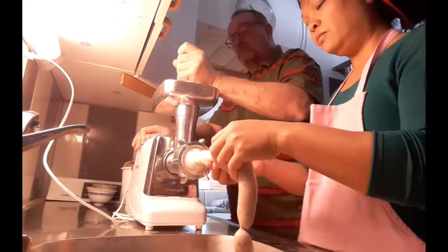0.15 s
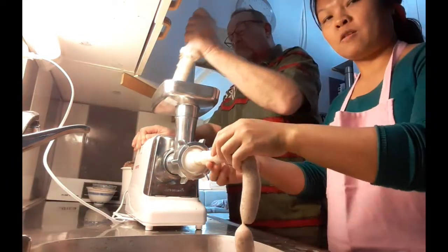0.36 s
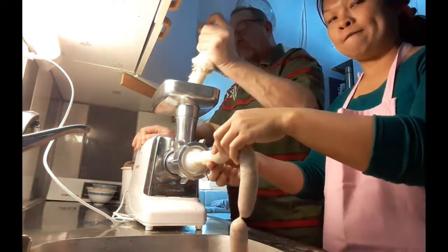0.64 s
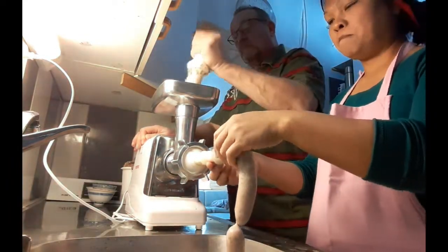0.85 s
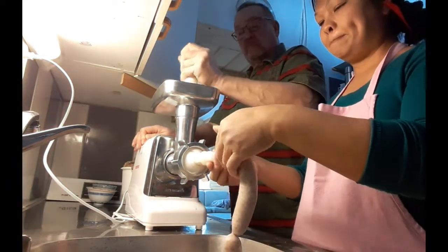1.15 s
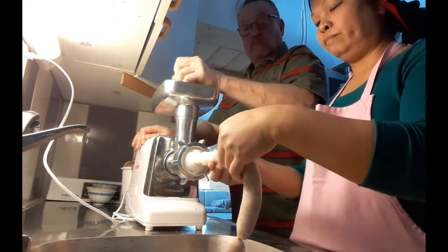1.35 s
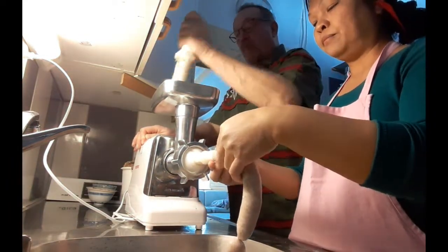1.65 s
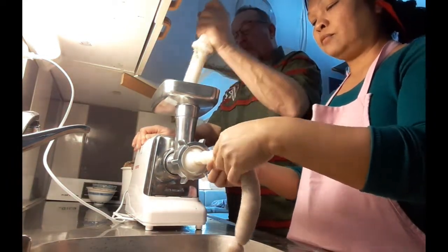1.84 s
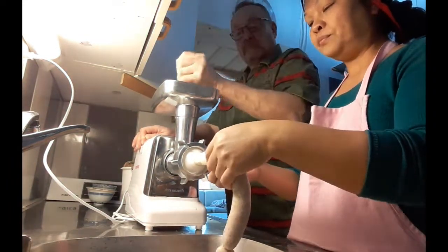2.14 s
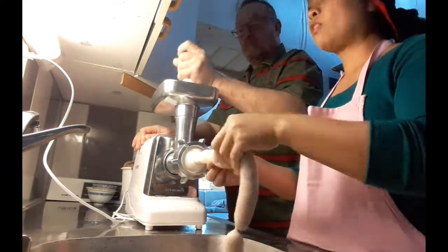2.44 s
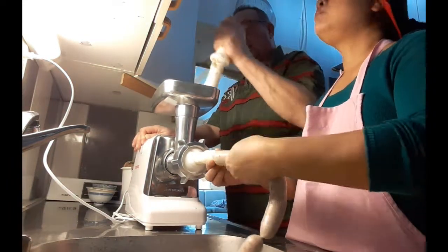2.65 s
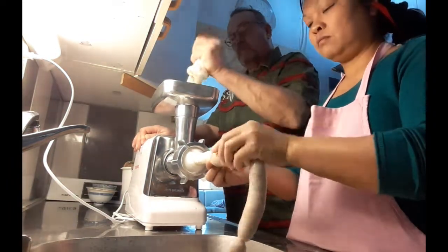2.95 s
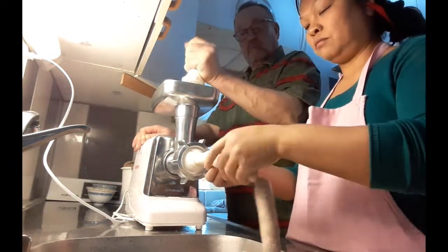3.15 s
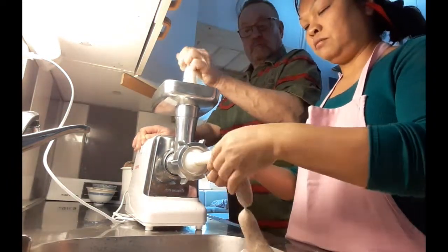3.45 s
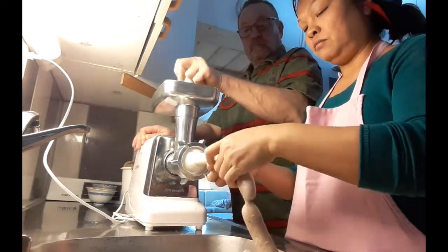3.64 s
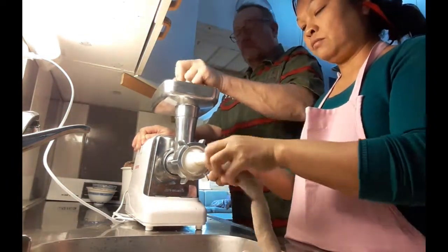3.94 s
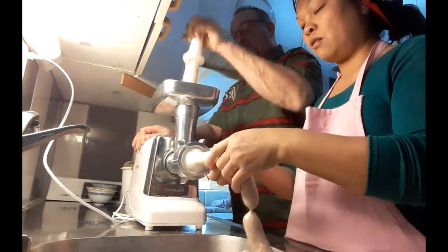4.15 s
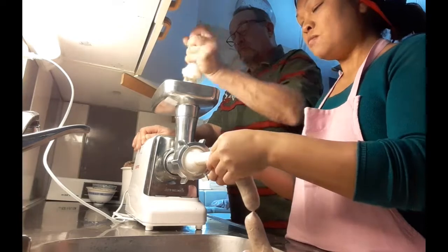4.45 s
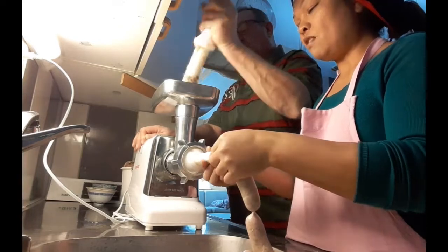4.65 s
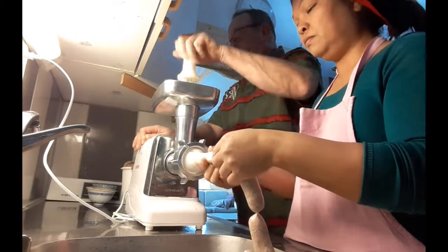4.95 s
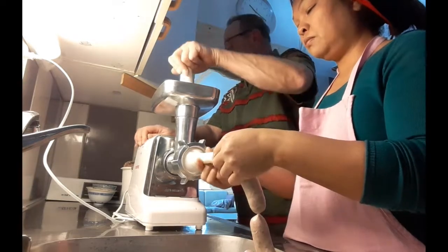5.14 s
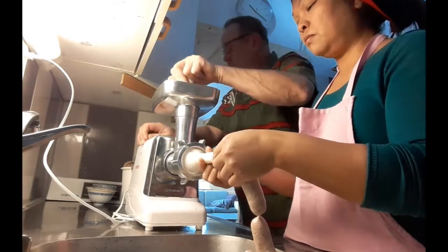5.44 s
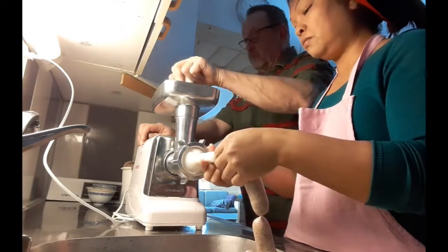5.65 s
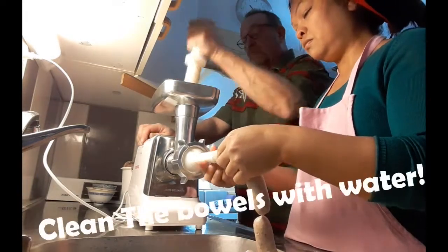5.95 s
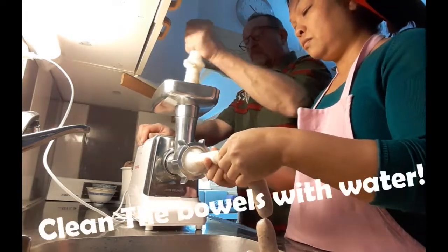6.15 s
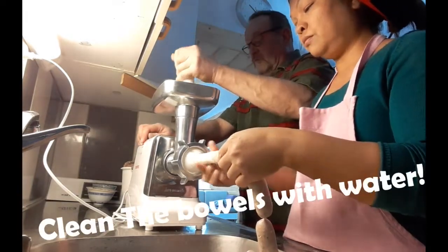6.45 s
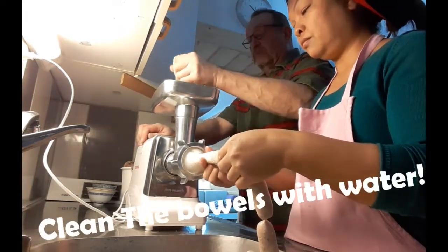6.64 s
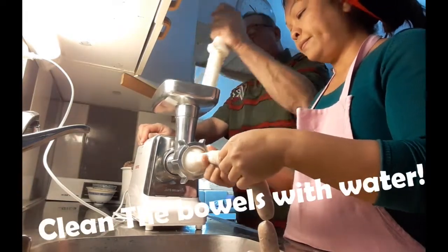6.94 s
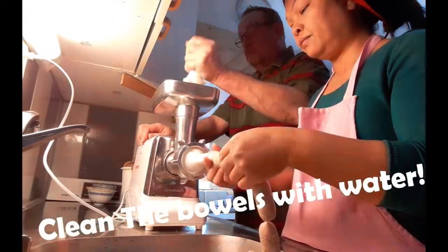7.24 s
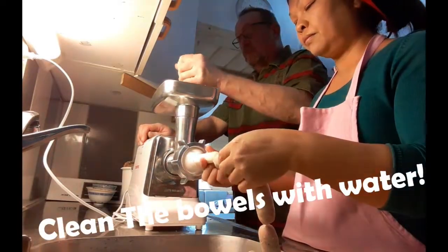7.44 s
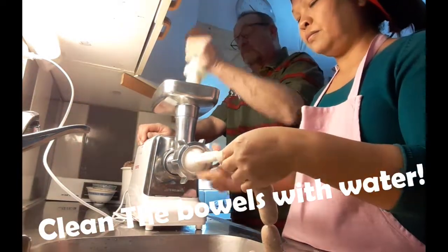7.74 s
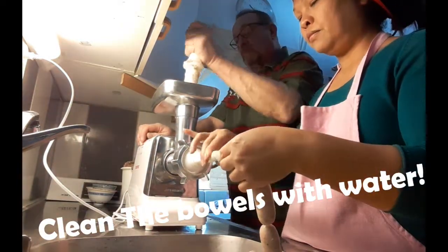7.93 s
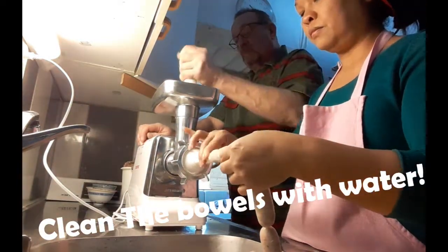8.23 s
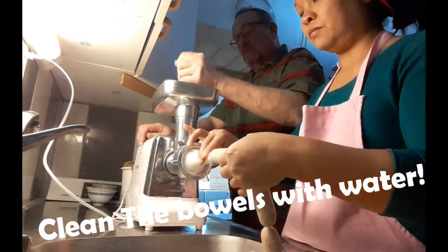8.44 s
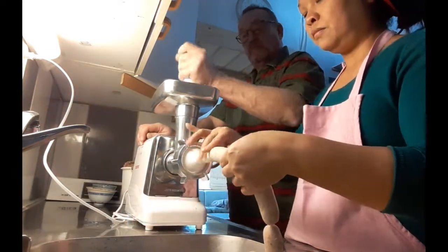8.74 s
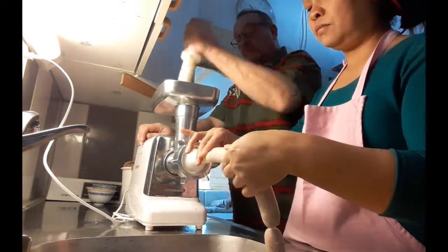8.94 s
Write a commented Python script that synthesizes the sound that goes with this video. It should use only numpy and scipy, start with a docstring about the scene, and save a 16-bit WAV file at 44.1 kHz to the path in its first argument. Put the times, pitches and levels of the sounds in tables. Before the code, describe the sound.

An electric meat grinder runs without a break in a kitchen, pressing meat into a sausage casing. Its motor gives a high, steady whine over a hissing gear rattle that throbs quickly and lightly. The pitch barely wavers with the load. Now and then the gears give a tiny squeak, and the plastic pusher bumps faintly in the feed tube beneath the machine noise.

```python
"""In a kitchen, an electric meat grinder runs under load, pressing meat into a sausage casing.
A fast brush motor whines and drives a layshaft, whose 17-tooth pinion sings, rattles and now and then
squeaks against a slightly eccentric wheel; the eccentricity modulates the sound nine times a second.
Resonances of the housing colour the rattle and the brush hiss. Beneath them lie a gear drone, the
stator's hum and soft bumps of the pusher in the feed tube."""
import sys
import numpy as np
from scipy import signal
from scipy.fft import rfft, irfft
from scipy.io import wavfile
from scipy.ndimage import uniform_filter1d

SR = 44100
rng = np.random.default_rng(int(sys.argv[2]) if len(sys.argv) > 2 else 0)


def dump(signal):
    """Clip the signal to [-1, 1] and save it as 16-bit WAV at the path in sys.argv[1]."""
    limited = np.clip(np.atleast_2d(signal).T, -1, 1)
    pcm = np.round(limited * 32767).astype(np.int16)
    wavfile.write(sys.argv[1], SR, pcm)


N = 400868

PINION_TEETH, WHEEL_TEETH = 17, 104  # layshaft pinion and the wheel it drives
MOTOR_TEETH, LAYSHAFT_GEAR_TEETH = 7, 47  # motor pinion and the gear it drives
# Layshaft speed, lower the fuller the auger is. Each row: time in seconds, turns per second.
LAYSHAFT_SPEED = [(0.0, 56.61), (0.95, 56.65), (1.2, 56.36), (1.8, 56.19), (2.2, 56.34), (2.8, 56.14),
                  (3.7, 56.45), (4.15, 56.19), (5.0, 56.22), (5.35, 56.52), (5.9, 56.1), (6.7, 56.49),
                  (7.3, 57.13), (8.0, 56.83), (8.3, 56.99), (9.09, 56.82)]
# Whine of the motor pinion. Each row: time in seconds, level in dB.
WHINE_LEVEL = [(0, -56), (0.22, -63), (0.42, -59), (0.72, -63.5), (1.08, -55.5), (1.45, -57), (1.6, -63.5),
               (1.88, -62), (2.06, -58.5), (2.42, -58), (2.68, -66), (3.25, -59.5), (3.95, -59),
               (4.15, -67), (6.8, -69), (7.3, -61.5), (7.85, -62.5), (8.15, -68), (9.09, -64)]


def gear_mesh(shaft, wheel, loose_from_hz=56.65, loose_at_hz=56.88):
    """Periodic forcing: two contacts a tooth sing a firm tone, whose octave comes and goes with the whine."""
    contacts = 2 * PINION_TEETH * shaft
    # At high speed the auger runs nearly empty and the teeth lose their firm contact.
    looseness = ramp(curve(LAYSHAFT_SPEED), loose_from_hz, loose_at_hz)
    lead_db = -53.5 - 3.5 * looseness
    octave_db = -67 + 4 * slack() + 0.41 * whine_excess_db()
    lead = tone(contacts, waver_db=0.4, slip=0.1) * undb(lead_db)
    octave = tone(2 * contacts, waver_db=0.74, slip=0.54) * undb(octave_db)
    return lead * throb(wheel, depth=0.65, peak=0.485) + octave * throb(wheel, depth=0.2, peak=0.31)


def layshaft_tones(shaft, wheel):
    """Forces that repeat with every turn of the layshaft sound at harmonics of its speed."""
    # Harmonic numbers. Each entry: cycles per layshaft turn.
    orders = [15, 16, 17, 24, 28, 30, 36, 51, 58, 62, 64, 66, 70, 76, 78, 86, 92, 110, 118, 124, 134]
    # The partial at each order. Each row: level at full load in dB, change at light load in dB,
    # throb depth from 0 to 1, loudest point as a fraction of the wheel's turn.
    partials = [(-90.5, -1, 0, 0.8), (-58, -3.5, 0.39, 1), (-61, -6, 0.56, 0.52), (-70.5, -14, 0.5, 1),
                (-69.5, -9.5, 0, .56), (-63.5, 7.5, 0.1, 0), (-76.5, 4, 0.6, 0.7), (-70, 2, 0.7, 0.57),
                (-79, 8, .3, .55), (-63.5, -10, 0.6, .68), (-76.5, 4.5, .3, 0.3), (-84, 10.5, 0.2, .55),
                (-75, 1.5, 0.6, 0.4), (-78, -3, 0.1, 0.4), (-70.5, 4.5, 0.2, 0.14), (-72, 5, .19, .99),
                (-65, -10.5, 0.8, 0.53), (-69, -8, .3, 0.9), (-74, 11, .3, 0.7), (-73.5, -1.5, .3, .55),
                (-73, -4, 0.2, 0.2)]
    return harmonics(shaft, orders, partials, wheel, waver_db=0.54, slip=0.27)


def motor_tones(motor, wheel):
    """The rotor's periodic motion sounds at even harmonics of its speed."""
    # Harmonic numbers. Each entry: cycles per motor turn.
    orders = [2, 4, 6]
    # The partial at each order. Each row: level at full load in dB, change at light load in dB,
    # throb depth from 0 to 1, loudest point as a fraction of the wheel's turn.
    partials = [(-59, 5, 0.46, 0.1), (-68, 0.5, .05, 0.13), (-69.5, 5.5, 0.14, 0.62)]
    return harmonics(motor, orders, partials, wheel, waver_db=0.5, slip=0.22)


def pinion_whine(motor, wheel, wobble_hz=8):
    """Mesh tone of the motor pinion, two contacts a tooth: a whistle with random frequency modulation."""
    # Brief flares of the whine. Each row: centre in seconds, length in seconds, level in dB.
    flares = [(3.26, .09, -68), (4.5, .07, -63), (5.9, 0.099, -67), (6.09, .1, -63)]
    contacts = 2 * MOTOR_TEETH * motor + np.cumsum(wobble_hz * walk(16)) / SR
    gain = undb(curve(WHINE_LEVEL)) + swells(flares)
    return tone(contacts, waver_db=1.7, slip=0.46) * gain * throb(wheel, depth=0.17, peak=0.31)


def tooth_squeaks(shaft):
    """Friction between the teeth excites brief squeaks at three times the tooth rate."""
    # Rubbing squeaks. Each row: centre in seconds, length in seconds, level in dB.
    rubs = [(2.317, .06, -61), (3.425, .1, -58), (3.67, 0.079, -62), (3.915, .06, -61), (5.276, .06, -57),
            (7.773, 0.045, -58), (8.107, .05, -62), (8.615, .08, -58), (8.73, .06, -62)]
    return tone(3 * PINION_TEETH * shaft, waver_db=0.8, slip=0.3) * swells(rubs)


def gearbox_noise(shaft, wheel):
    """Broadband excitation of the housing: low noise, tooth impacts, sliding friction and brush hiss."""
    knocks = rattle(shaft, wear=0.16, chance=0.98, jitter_s=40e-6)
    low = band(rng.standard_normal(N), 70, 1218) * throb(wheel, depth=0.45, peak=0.11)
    low *= undb(0.2 + 1.3 * walk(12))
    middle = band(knocks, 1165, 3120) * throb(wheel, depth=0.28, peak=0.43) * undb(0.42)
    # The hiss comes in spurts, two and eight to a layshaft turn.
    spurts = 1 + 0.082 * np.cos(4 * np.pi * shaft) + 0.11 * np.cos(16 * np.pi * shaft)
    return housing(low + middle + tooth_rasp(shaft, wheel, spurts) + brush_hiss(shaft, wheel, spurts))


def rattle(shaft, wear, chance, jitter_s):
    """An impulse train: teeth knock going in and coming out, the force varying by wear and by chance."""
    contact = np.floor(2 * PINION_TEETH * shaft).astype(int)
    onsets = np.flatnonzero(np.diff(contact))
    tooth_error = rng.standard_normal(PINION_TEETH)
    worn_force = unit(tooth_error - tooth_error.mean())[contact[onsets] % PINION_TEETH]
    random_force, lateness = rng.standard_normal((len(onsets), 2)).T
    onsets = np.clip(onsets + np.round(lateness * jitter_s * SR).astype(int), 0, N - 1)
    pulses = np.zeros(N)
    np.add.at(pulses, onsets, wear * worn_force + chance * random_force)
    return unit(pulses)


def tooth_rasp(shaft, wheel, spurts):
    """Sliding friction of the teeth makes treble noise that rises slightly with the whine."""
    scrape = rattle(shaft, wear=0.5, chance=0.75, jitter_s=22e-6)
    sliding = unit((rng.standard_normal(N) + 0.26 * scrape) * spurts)
    gain_db = 0.5 + 0.091 * whine_excess_db() + 0.48 * walk(12)
    return band(sliding, 2855, 7670) * throb(wheel, depth=0.06, peak=0.33) * undb(gain_db)


def brush_hiss(shaft, wheel, spurts):
    """Sliding contact of the brushes makes the highest noise, mixed with fine ticks of the teeth."""
    hiss = rng.standard_normal(N)
    ticks = rattle(shaft, wear=0.7, chance=0.7, jitter_s=8e-6)
    fizz = band(unit((hiss + 0.45 * ticks) * spurts), 7240, 20000)
    return fizz * throb(wheel, depth=0.17, peak=0.59) * undb(1.18 + 0.23 * walk(16))


def housing(excitation, size=8192):
    """The housing acts as a minimum-phase filter: panel resonances on top of a broad colour."""
    # Broad colour of the housing. Each row: frequency in Hz, spectral level in dB.
    colour = [(100, -142), (160, -127), (250, -112.5), (400, -109.2), (650, -107), (1100, -120.4),
              (1450, -105.2), (2100, -106), (3200, -93.5), (6500, -93.5), (9000, -93.5), (9800, -99),
              (15500, -101.3)]
    # Panel resonances. Each row: centre in Hz, width in Hz, lift in dB.
    panels = [(544, 82, 6), (610, 28, 5.5), (682, 25, 5), (779.7, 100.4, 20.5), (844.6, 49, 14.5),
              (938, 159, 19.5), (1059, 21, 10.5), (1108.5, 87, 16), (1250, 212, 20.5), (1568, 85, 7),
              (1685, 119, 13), (1829, 266, 23), (2068, 60, 8.5), (2120, 37, 5.5), (2280, 41, 8),
              (2362, 295, 13.5), (2737, 88, 9), (2870, 45, 8.5), (3240, 140, 1.5), (3460, 54, 5),
              (3600, 48, 1.5), (3860, 150, 3.5), (4400, 53, 2.5), (4570, 150, 4.5), (4854, 64, 4.5),
              (5290, 400, 3), (6110, 350, 7), (6570, 190, 5), (6900, 92, 4), (7650, 150, 5.5),
              (8060, 150, 4), (8450, 200, 3), (9070, 170, 4), (10300, 200, 2.5), (10850, 400, 3.5),
              (12100, 380, 6), (12850, 250, -0.5), (15250, 270, 1.5)]
    hz = np.arange(size // 2 + 1) * SR / size + 1
    colour_hz, colour_db = np.transpose(colour)
    db = np.interp(np.log(hz), np.log(colour_hz), colour_db)
    db += sum(lift / (1 + (2 * (hz - centre) / width) ** 2) for centre, width, lift in panels)
    cepstrum = irfft(np.log(undb(db) * np.sqrt(SR / 2)))
    # Folding the cepstrum onto positive time makes the response causal.
    cepstrum[1:size // 2] *= 2
    cepstrum[size // 2 + 1:] = 0
    impulse_response = irfft(np.exp(rfft(cepstrum)))
    return signal.fftconvolve(excitation, impulse_response)[:N]


def gear_drone(shaft, start_s=0.15, attack_s=0.43, fade_from_s=3.77):
    """A subharmonic at half the tooth rate sets in, sags slowly, then dies away to a trace."""
    t = np.arange(N) / SR
    age_s = np.maximum(t - start_s, 0)
    fading_s = np.maximum(t - fade_from_s, 0)
    envelope = ramp(age_s, 0, attack_s) * undb(-69.5 - 1.4 * age_s - 17 * fading_s) + undb(-95)
    return tone(PINION_TEETH * shaft / 2, waver_db=1.5, slip=0.065) * envelope


def stator_hum(hz=300):
    """Alternating magnetic force makes the stator hum at a pitch independent of the shaft speed."""
    # Strength of the hum. Each row: time in seconds, level in dB.
    levels = [(0, -79), (1, -76), (2.6, -75.5), (3.25, -72.5), (3.5, -75.5), (5.7, -77.8), (5.9, -73),
              (6.25, -73), (6.5, -70.3), (7.5, -77.5), (8, -75.7), (9.09, -77.5)]
    return tone(hz * np.arange(N) / SR, waver_db=1.6, slip=0.37) * undb(curve(levels))


def low_tones(shaft, dip_s=0.05):
    """Drone and hum share one amplitude envelope, so their levels dip briefly together."""
    # Dips in level. Each row: centre in seconds, change in dB.
    dips = [(.31, -8), (1.58, -9), (2.55, -8), (4.15, -4)]
    t = np.arange(N) / SR
    dips_db = sum(db * np.exp(-((t - s) / dip_s) ** 2) for s, db in dips)
    return (gear_drone(shaft) + stator_hum()) * undb(dips_db)


def pusher(attack_s=0.0024, detune=0.083, size=8000):
    """Soft impacts of the plastic pusher excite damped modes of the tube, detuned anew for each thud."""
    # Bumps against meat and tube. Each row: start in seconds, level in dB.
    bumps = [(0.165, -74), (0.245, -85), (0.553, -71), (1.004, -83), (2.037, -75), (2.24, -76),
             (3.026, -76), (4.551, -78), (4.878, -78), (5.849, -73), (6.712, -79), (7.506, -81),
             (8.166, -81), (8.72, -77)]
    # Modes of the feed tube. Each row: frequency in Hz, relative level in dB, 60 dB decay time in seconds.
    modes = [(174, -9.5, 0.14), (240, 1.5, 0.14), (349, 1, 0.11), (430, -1, .08), (544, 1, 0.076)]
    t = np.arange(size) / SR
    thuds = np.zeros(N + size)
    for start_s, db in bumps:
        tunings = 1 + detune * rng.standard_normal(len(modes))
        ring = sum(undb(mode_db - 60 * t / t60) * np.sin(2 * np.pi * hz * tuning * t)
                   for (hz, mode_db, t60), tuning in zip(modes, tunings))
        start = int(start_s * SR)
        thuds[start:start + size] += undb(db) * ring * (1 - np.exp(-t / attack_s))
    return band(thuds[:N], 127, 600)


def layshaft_turns(ripple_hz=0.13, bite_hz=0.07):
    """Turns are the integral of speed, which the eccentric wheel ripples and the auger's bites jolt."""
    speed = curve(LAYSHAFT_SPEED)
    wheel = np.cumsum(speed) / SR * PINION_TEETH / WHEEL_TEETH
    ripple = np.cos(2 * np.pi * (wheel - 0.27))
    # The auger bites about every second turn of the wheel.
    bites = walk(5) * np.cos(np.pi * wheel) + walk(5) * np.sin(np.pi * wheel)
    return np.cumsum(speed + ripple_hz * ripple + bite_hz * bites) / SR


def slack(full_hz=56.1, free_hz=57.15):
    """Load slows the motor, so speed tells how light it is: 0 with the auger full, 1 running free."""
    return ramp(curve(LAYSHAFT_SPEED), full_hz, free_hz)


def throb(wheel, depth, peak):
    """Amplitude modulation by the eccentric wheel: loudest at `peak` of each turn, deepest under load."""
    swing = depth * (1 - 0.31 * slack())
    return np.sqrt(np.maximum(1 + swing * np.cos(2 * np.pi * (wheel - peak)), 0))


def whine_excess_db():
    """How far the whine's level curve stands above its mean."""
    level_db = curve(WHINE_LEVEL)
    return level_db - level_db.mean()


def harmonics(turns, orders, partials, wheel, waver_db, slip):
    """Superposition of one shaft's partials; load shifts their balance and the wheel modulates them."""
    light = slack()
    return sum(tone(order * turns, waver_db, slip) * undb(db + light_db * light) * throb(wheel, depth, peak)
               for order, (db, light_db, depth, peak) in zip(orders, partials))


def tone(cycles, waver_db, slip):
    """A sinusoid whose level wavers and whose phase slips (in radians) at random."""
    phase = 2 * np.pi * (cycles + rng.random()) + slip * walk(45)
    return np.sqrt(2) * np.sin(phase) * undb(waver_db * walk(25))


def swells(rows):
    """A sum of Gaussian envelopes. Each row: centre in seconds, length in seconds, peak in dB."""
    t = np.arange(N) / SR
    return sum(undb(db) * np.exp(-(2 * (t - s) / length) ** 2) for s, length, db in rows)


def band(x, lo_hz, hi_hz):
    """Zero-phase band-pass with steep skirts."""
    hz = np.arange(N // 2 + 1) * SR / N + 1
    return irfft(rfft(x) / (1 + (lo_hz / hz) ** 16) / (1 + (hz / hi_hz) ** 16), N)


def walk(rate_hz):
    """Slow noise of rms 1: random levels, each held for one period, smoothed twice."""
    hold = int(SR / rate_hz)
    held = np.repeat(rng.standard_normal(N // hold + 1), hold)
    return unit(uniform_filter1d(uniform_filter1d(held, hold), hold)[:N])


def curve(rows):
    """Linear interpolation. Each row: time in seconds, value."""
    return np.interp(np.arange(N) / SR, *np.transpose(rows))


def ramp(x, start, end):
    """0 up to start, 1 from end on, linear between."""
    return np.clip((x - start) / (end - start), 0, 1)


def unit(x):
    """Scale to rms 1."""
    return x / np.sqrt(np.mean(x ** 2))


def undb(db):
    """Decibels to amplitude ratio."""
    return 10 ** (np.asarray(db) / 20)


def scene():
    """Gear ratios lock all shafts to one speed; the sources add up, alike in both channels."""
    shaft = layshaft_turns()
    wheel = shaft * PINION_TEETH / WHEEL_TEETH
    motor = shaft * LAYSHAFT_GEAR_TEETH / MOTOR_TEETH
    gears = gear_mesh(shaft, wheel) + tooth_squeaks(shaft) + layshaft_tones(shaft, wheel)
    rotor = motor_tones(motor, wheel) + pinion_whine(motor, wheel)
    sound = gears + rotor + low_tones(shaft) + pusher() + gearbox_noise(shaft, wheel)
    return np.array([sound, sound])


def record(dry):
    """An elliptic low-pass cuts the highest treble steeply."""
    cutoff_hz = 15750
    return signal.sosfilt(signal.ellip(10, 0.1, 80, cutoff_hz, fs=SR, output="sos"), dry)


dry = scene()
out = record(dry)
dump(out)
```